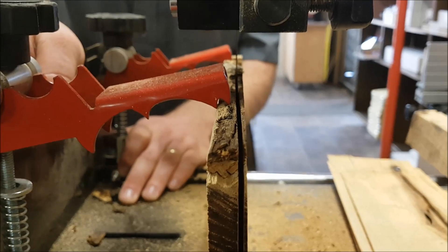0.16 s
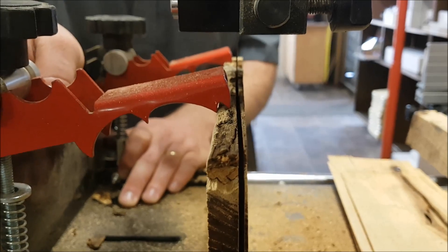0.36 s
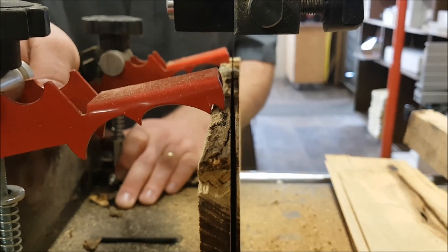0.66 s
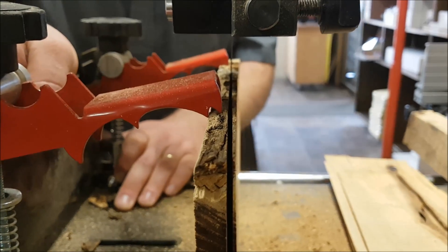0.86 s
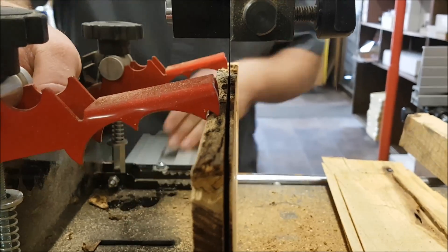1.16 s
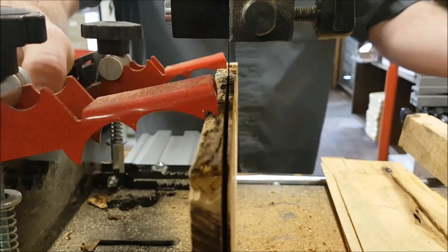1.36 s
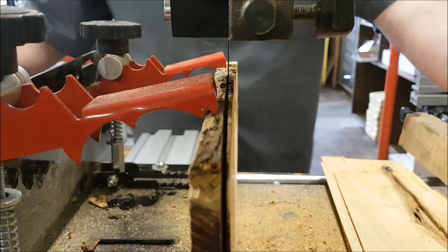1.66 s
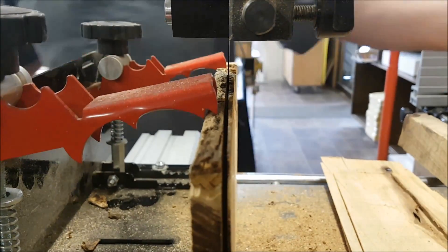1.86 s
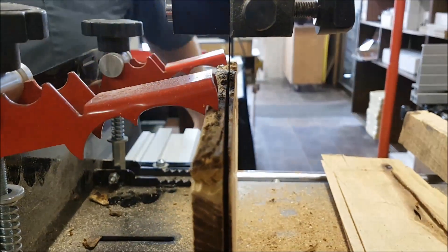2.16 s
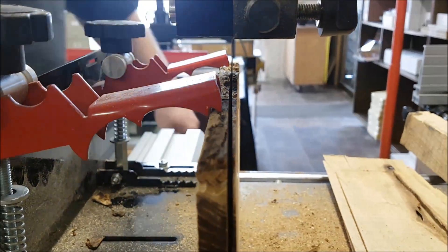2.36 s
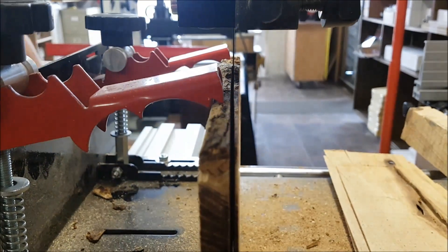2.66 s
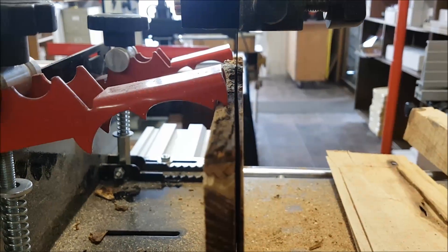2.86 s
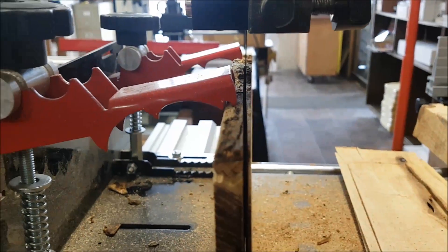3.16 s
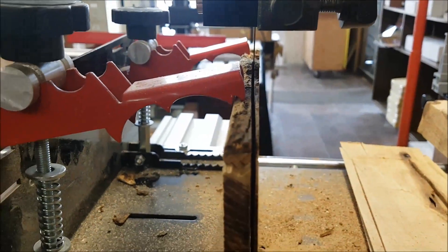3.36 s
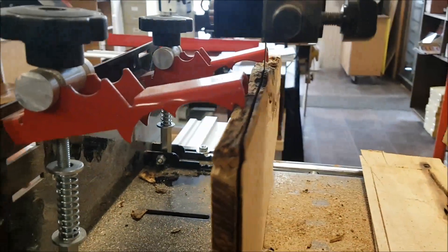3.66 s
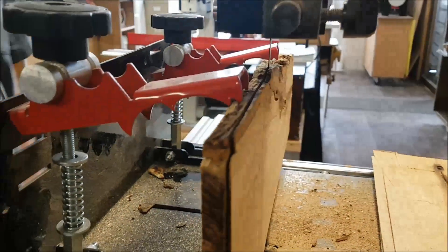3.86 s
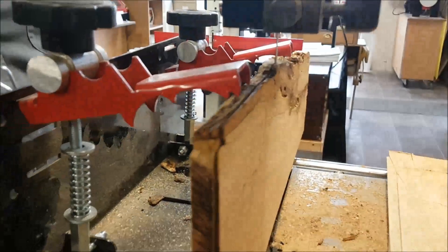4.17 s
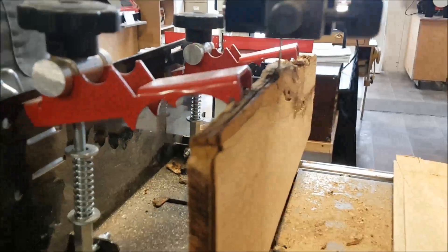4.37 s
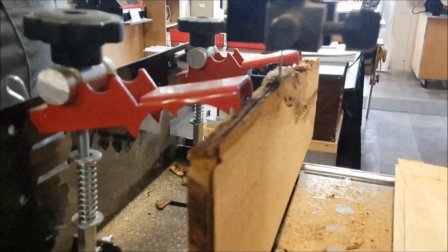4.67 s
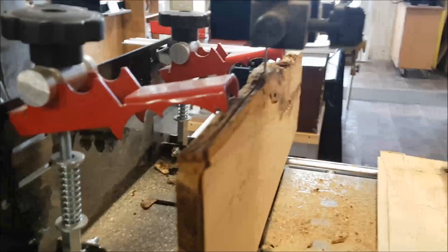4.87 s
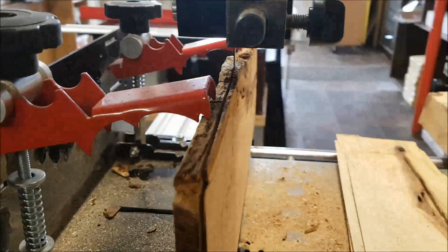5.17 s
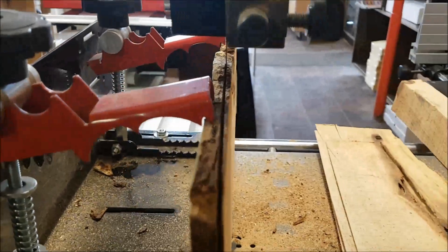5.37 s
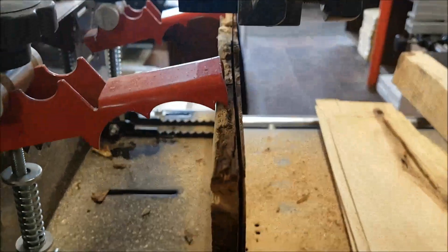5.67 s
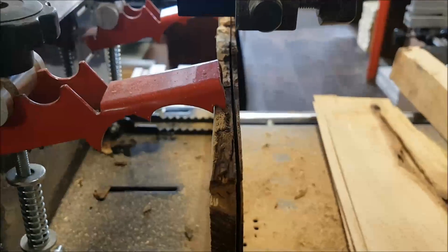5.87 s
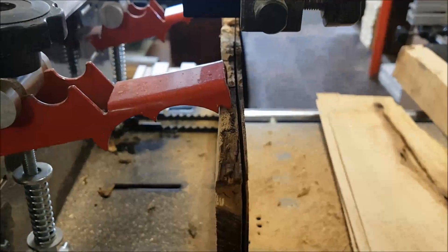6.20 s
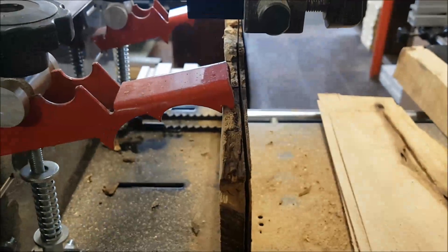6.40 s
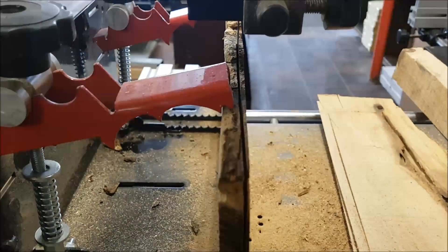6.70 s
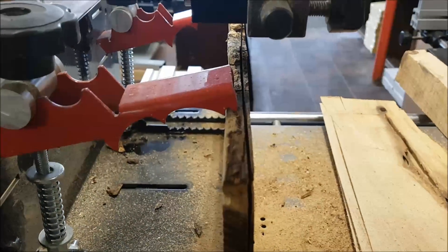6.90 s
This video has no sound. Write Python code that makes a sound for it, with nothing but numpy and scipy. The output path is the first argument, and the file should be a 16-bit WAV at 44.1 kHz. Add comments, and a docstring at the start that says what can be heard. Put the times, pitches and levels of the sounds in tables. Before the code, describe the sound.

A bandsaw squeals through the end of a board, then is switched off and coasts down with a falling whine and metallic hiss.

```python
"""A bandsaw finishes a cut through a board in a workshop: stick-slip makes the blade squeal in the kerf
for a second, then it runs free. The motor is switched off, and the whine at the tooth-passing frequency
sinks as the wheels coast, while friction in the guides keeps the band hissing and ringing.
A second motor is then switched off and runs down quickly. Ticks of the band on its guides and soft
bumps from around the table go on almost to the end."""
import sys
import numpy as np
from scipy import signal
from scipy.fft import rfft, irfft, next_fast_len
from scipy.io import wavfile
from scipy.ndimage import uniform_filter1d, map_coordinates

SR = 44100
rng = np.random.default_rng(int(sys.argv[2]) if len(sys.argv) > 2 else 0)


def store_wav(level_fs):
    """Save 16-bit WAV to argv[1]."""
    pcm = np.round(np.clip(np.atleast_2d(level_fs), -1, 1) * 32767)
    wavfile.write(sys.argv[1], SR, pcm.T.astype(np.int16))


N = 310444
TIME = np.arange(N) / SR
FFT_SIZE = next_fast_len(N)
FREQS = np.maximum(np.arange(FFT_SIZE // 2 + 1) * SR / FFT_SIZE, 1)
CUTOFF_HZ = 15800


# tooth-passing frequency: time_s, rate_hz
TOOTH_PASSING = [(0.0, 2002.0), (0.35, 2001.0), (0.8, 2008.0), (1.05, 2022.0), (1.69, 2028.0),
                 (1.76, 1974.0), (1.84, 1920.0), (2.0, 1832.0), (2.24, 1734.0), (2.48, 1651.0),
                 (2.96, 1516.0), (3.68, 1335.0), (4.64, 1112.0), (5.6, 897.0), (6.08, 787.0), (6.56, 670.0),
                 (7.04, 548.0)]
def blade_motion():
    """Phase is the integral of frequency: the tooth rate sums to the count of teeth passed."""
    rate_hz, = in_time(TOOTH_PASSING)
    return rate_hz, np.cumsum(rate_hz) / SR


# resonances of the squealing band: centre_hz, width_hz, gain_db
SQUEAL_RESONANCES = [(1624, 44, -5.5), (1714, 50, -6), (1870, 50, -22)]
# hard catches in the kerf, last on the few remaining fibres: middle_s, half_length_s, level_db
KERF_CATCHES = [(0.023, 0.026, -25.5), (0.197, 0.014, -24), (0.27, 0.03, -24.5), (0.416, 0.012, -24.5),
                (.46, 0.015, -25.5), (0.65, 0.025, -29), (0.716, 0.015, -25), (0.787, .006, -27),
                (0.804, 0.0074, -21.5), (0.843, 0.0088, -22), (0.88, .012, -25.5), (0.973, 0.017, -30.5),
                (1.066, 0.0083, -27.5), (1.153, 0.019, -34)]
def kerf_squeal(pressure_db, level_db=-30, end_s=0.88, release_s=0.053):
    """Stick-slip oscillation: the buried band swings at its resonances until friction limits it."""
    ringing = shape(scrape(grain_db=4.5), response(FREQS, SQUEAL_RESONANCES))
    swing = rms_one(signal.hilbert(ringing, FFT_SIZE)[:N])
    phase = np.angle(swing)
    drive = rms_one(np.abs(swing) * from_db(5 * (pressure_db + 0.81 * drift(29.97))))
    amplitude = rms_one(np.tanh(1.1 * drive))
    # limiting adds harmonics; the third grows towards the end of the cut
    third = from_db(-24.5 + 7.5 * np.minimum(TIME, end_s)) * amplitude ** 2
    wave = np.cos(phase) + from_db(-14) * np.cos(2 * phase) + third * np.cos(3 * phase)
    chatter = amplitude * from_db(level_db) * np.exp(-np.maximum(TIME - end_s, 0) / release_s)
    catches = sum(from_db(db) * swell(s, half) for s, half, db in KERF_CATCHES)
    return np.maximum(chatter, np.tanh(2 * np.abs(swing)) * catches) * np.sqrt(2) * wave


# fundamental of the tooth tone: time_s, level_db
WHINE_LEVEL = [(0, -49), (.95, -54), (1.1, -45.5), (1.72, -48), (1.85, -39), (2.3, -42), (3.3, -41),
               (3.8, -48.5), (4.6, -48.5), (5.55, -56.5), (6.1, -52), (7.04, -70)]
# its overtones, before the guides colour them: multiple, level_db
TOOTH_HARMONICS = [(2, -8), (3, -5), (4, -10), (5, -8), (6, 0), (7, 0.5), (8, -5), (11, 0), (15, -1),
                   (18, -9), (24, -7)]
def tooth_tones(teeth, rate_hz, pressure_db, body):
    """Periodic forcing: the teeth make a harmonic series whose overtones swell at each resonance."""
    phase = 2 * np.pi * teeth + 0.067 * drift(35)
    multiples, levels = np.transpose(TOOTH_HARMONICS)
    overtones = np.zeros(N)
    for k in range(2, 25):
        gain = np.interp(k * rate_hz, FREQS, body) * (k * rate_hz < CUTOFF_HZ)
        level_db = np.interp(k, multiples, levels) - 18 + 2.5 * drift(12)
        overtones += gain * from_db(level_db) * np.sin(k * phase + 2 * np.pi * rng.random())
    tone = np.imag(uneven_set(teeth) * np.exp(1j * (phase + 1.04 * drift(35))))
    whine_db = in_time(WHINE_LEVEL)[0] + 1.8 * pressure_db + 2 * drift(18)
    return from_db(whine_db) * np.sqrt(2) * tone, overtones


def uneven_set(teeth, depth=0.26, teeth_per_loop=163):
    """Modulation: unevenly set teeth give their tone sidebands, which beat as the band loops round."""
    sidebands = sum(np.exp(2j * np.pi * (k * teeth / teeth_per_loop + rng.random())) / abs(k)
                    for k in (-2, -1, 0.81, 2))
    return rms_one(1 + depth * sidebands)


# friction on the band: time_s, hiss_db, treble_db
FRICTION_LEVELS = [(0, -35.5, -34.5), (.13, -33.5, -32.5), (.33, -34.5, -36), (.65, -34.5, -35.5),
                   (1.1, -35.5, -38.5), (1.55, -30, -37), (1.9, -34, -39.5), (2.8, -34.5, -40),
                   (2.87, -34.5, -38.8), (3.4, -32, -37.5), (3.67, -32, -39.5), (3.76, -34.5, -41),
                   (4.65, -34.5, -44), (5.1, -37.5, -45), (5.8, -36.5, -44), (7.04, -39.5, -46)]
# the band presses on its guides or eases off: middle_s, half_length_s, change_db
GUIDE_PRESSES = [(2.53, 0.047, 3), (4.894, .04, -1.5), (4.987, .025, 2.5), (5.06, 0.044, -1.5),
                 (6.12, 0.036, 1.3), (6.18, .025, -3)]
# resonances of the band in the kerf: centre_hz, width_hz, gain_db
KERF_RESONANCES = [(1135, 98, -5), (2510, 150, -4), (3200, 132, 10.5), (3640, 130, 0), (4800, 780, -3),
                   (5695, 105, 5.5), (7210, 210, -5.5), (8080, 220, -10), (9500, 260, -12.5),
                   (12090, 150, -7), (13650, 260, -20)]
# hiss of teeth and chips: frequency_hz, density_db
KERF_SPECTRUM = [(500, -27), (1000, -34), (1400, -9), (2200, -7), (4000, -6.5), (6500, -5.5), (8500, -13.5),
                 (11000, -16.5), (14000, -15.5), (16000, -22.5)]
# resonances of guides and frame: centre_hz, width_hz, gain_db
GUIDE_RESONANCES = [(1121, 23, -4), (1270, 45, -19), (1406, 51, -2.5), (1660, 150, -6.5), (1867, 110, -4.5),
                    (2306, 111, -2), (2570, 250, -8), (3300, 115, -6.5), (3940, 173, -3), (4462, 268, 2),
                    (4984, 140, -4.5), (5630, 180, -4), (6053, 216, -2), (6580, 180, -9.5),
                    (8440, 125, -10.5), (9070, 105, -10), (11420, 250, -16.5), (13250, 720, -16)]
# hiss of steel on the guides: frequency_hz, density_db
GUIDE_SPECTRUM = [(500, -36.5), (1000, -13.5), (2000, -19.5), (3500, -13), (5300, -16.5), (7200, -10.5),
                  (7900, -15.5), (10000, -16.5), (12200, -19), (14000, -23.5), (16000, -23)]
def running_blade(teeth, rate_hz, pressure_db):
    """Source and filter: friction excites first the kerf, then the guides, beneath the tooth tones."""
    press_db = sum(db * swell(s, half) for s, half, db in GUIDE_PRESSES)
    hiss_db, treble_db = in_time(FRICTION_LEVELS) + press_db
    bite = in_wood()
    kerf = hiss_response(KERF_RESONANCES, KERF_SPECTRUM)
    guides = hiss_response(GUIDE_RESONANCES, GUIDE_SPECTRUM)
    force = rms_one(scrape(grain_db=1.5) * from_db(pressure_db + 0.42 * drift(25)))
    force += from_db(2.5 - hiss_db) * knocks() * rng.standard_normal(N)
    rub = np.sqrt(bite) * shape(force, kerf) + np.sqrt(1 - bite) * shape(force, guides)
    whine, overtones = tooth_tones(teeth, rate_hz, pressure_db, guides)
    # harder contact is brighter: above 7.5 kHz the hiss follows its own level
    treble = shape(rub, 1 / (1 + (7500 / FREQS) ** 12))
    treble_rms = np.sqrt(uniform_filter1d(treble ** 2, SR // 4) + 1e-12)
    hiss = from_db(hiss_db - 3) * (rub - treble) + from_db(treble_db - 0.64) * treble / treble_rms
    # wood in the gullets damps the overtones
    return hiss + from_db(hiss_db) * (1 - 0.35 * bite) * overtones + whine


def in_wood(middle_s=1.002, exit_length_s=0.34):
    """Contact with the wood falls from 1 to 0 as the board runs out."""
    return np.clip(0.5 - (TIME - middle_s) / exit_length_s, 0, 1)


# unevenness of wheels and pulley: period_teeth, depth_db
WHEEL_RUNOUT = [(159.4, 0.6), (93, 0), (53, 0.17), (65.6, 1), (33.62, 0.78)]
def guide_pressure_db(teeth):
    """Runout: uneven wheels and pulley vary the band's pressure on its guides periodically."""
    return sum(db * np.cos(2 * np.pi * (teeth / period + rng.random())) for period, db in WHEEL_RUNOUT)


# ringing of the band between its guides: time_s, level_db
SPAN_LEVEL = [(1.17, -50), (1.24, -35.5), (1.43, -35), (1.65, -39), (2.82, -37.5), (2.91, -34.5),
              (3.3, -37.5), (3.8, -41), (7.04, -45)]
# modes of that span: centre_hz, width_hz, gain_db
SPAN_RESONANCES = [(2980, 88, 6.5), (3090, 132, 1.5)]
def band_ring(pressure_db):
    """Modal response: the free span rings in uneven spurts as it rubs, and after every knock."""
    spurts = rms_one(from_db(0.9 * pressure_db + 1.5 * drift(14)))
    rubbing = spurts * from_db(in_time(SPAN_LEVEL)[0]) * np.sqrt(1 - in_wood())
    force = np.hypot(rubbing, from_db(-1) * knocks()) * scrape(grain_db=2.5)
    return shape(force, rms_one(response(FREQS, SPAN_RESONANCES)))


# the band hits its guides, from dry tick to short scrape: start_s, level_db, decay_s
GUIDE_KNOCKS = [(.946, -31, .004), (1.693, -42, 0.0036), (1.977, -31, .004), (2.066, -34.5, 0.011),
                (2.16, -32, 0.0064), (2.247, -36, 0.016), (2.351, -33, 0.019), (2.515, -37, .004),
                (2.545, -30.5, .005), (2.86, -32.5, .02), (3.032, -41, 0.013), (3.081, -31.5, 0.008),
                (3.703, -30, .004), (3.805, -38, 0.013), (4.06, -34, 0.015), (4.189, -39, 0.022),
                (4.287, -38, .018), (4.78, -33, 0.023), (4.802, -36, 0.0036), (4.938, -35.5, 0.023),
                (5.1, -37, .015), (5.266, -38, .015), (5.624, -38, .015), (5.824, -32, .004),
                (6.022, -39, .012), (6.26, -30, .004)]
def knocks():
    """Impact: the force envelope of each knock starts at once and decays exponentially."""
    force = np.zeros(N)
    for start_s, db, decay_s in GUIDE_KNOCKS:
        start = int(start_s * SR)
        age = TIME[:min(SR // 4, N - start)]
        force[start:start + len(age)] += from_db(db) * np.exp(-age / decay_s)
    return force


# tooth overtones that sing out: middle_s, half_length_s, multiple, level_db, tremble_rad
TOOTH_SQUEAKS = [(.07, 0.13, 6, -37, 2.1), (.66, .17, 6, -44, 0.64), (1.12, .12, 6, -50, .4),
                 (.95, .4, 7, -53, .6), (1.606, 0.21, 3, -37, 0.31), (1.624, .14, 2, -42.5, 0.35),
                 (2.0, .2, 7, -52, .3), (2.652, 0.31, 3, -41.5, 0.23), (3.07, 0.29, 2, -38, 0.73),
                 (3.156, 0.34, 3, -38, 1.2), (4.2, 0.68, 2, -47.5, 0.59), (5.55, 0.45, 2, -46, 1.3),
                 (6.14, .07, 4, -40, 0.99), (6.12, 0.063, 3, -46.5, 0.57)]
# belt and bearing tones in the cabinet: middle_s, half_length_s, multiple, level_db, tremble_rad
BELT_AND_BEARINGS = [(1.25, 0.28, .55, -52, 2.3), (3.57, 0.3, .5, -58.5, .9), (4.39, .3, .58, -53.5, 0.73),
                     (4.32, 0.22, .42, -61, 1.1), (4.98, 0.1, .52, -61, 0.81), (5.4, 0.12, .54, -62, 0.53)]
def resonant_swells(rows, teeth, flutter_db):
    """Passage through resonance: tones locked to the tooth rate swell at the listed moments."""
    tones = np.zeros(N)
    for middle_s, half_s, multiple, db, tremble_rad in rows:
        phase = 2 * np.pi * multiple * teeth + tremble_rad * drift(40)
        envelope = from_db(db + flutter_db * drift(19)) * swell(middle_s, half_s)
        tones += envelope * np.sqrt(2) * np.sin(phase)
    return tones


# resonances of the cabinet: centre_hz, width_hz, gain_db
CABINET_RESONANCES = [(346, 17, -4.5), (447, 34, -6.5), (506, 11.8, 3), (702, 28, -0.5), (796, 7.7, -16)]
# its broad rumble: frequency_hz, density_db
CABINET_SPECTRUM = [(20, -50), (50, -44), (100, -29), (160, -22.5), (250, -13), (390, -16.5), (460, -1.5),
                    (590, -10.5), (720, -6), (950, -6), (1300, -27), (2500, -43)]
def cabinet_rumble(rate_hz, db_per_octave=4.5, critical_hz=1060, width_hz=170):
    """Forced vibration: the rumble fades with blade speed, but swells around a critical speed."""
    slowing_db = db_per_octave * np.log2(rate_hz / rate_hz.max())
    critical_db = 4.5 * np.exp(-((rate_hz - critical_hz) / width_hz) ** 2)
    cabinet = response(FREQS, CABINET_RESONANCES, CABINET_SPECTRUM)
    return from_db(-53 + slowing_db + critical_db) * rms_one(shape(scrape(grain_db=3.5), cabinet))


def drive_hum(teeth, rate_hz, db_per_octave=27, load_loss_db=4, teeth_per_cycle=8.35):
    """Rotational tone: the drive's hum is weaker under load, and sinks and fades with speed."""
    level_db = -67 + db_per_octave * np.log2(rate_hz / rate_hz.max()) - load_loss_db * in_wood()
    return from_db(level_db + 2 * drift(15)) * np.sqrt(2) * np.sin(2 * np.pi * teeth / teeth_per_cycle)


# tone of the second motor: time_s, level_db
SECOND_MOTOR_LEVEL = [(0, -76), (1.2, -62), (2.55, -57), (2.68, -51.5), (2.88, -56.5), (3.0, -69),
                      (3.8, -90)]
def second_motor(pitch_hz=613, off_s=2.57, coast_s=0.81):
    """Exponential run-down: the pitch follows the speed, and the fan's rush follows its cube."""
    speed = np.exp(-np.maximum(TIME - off_s, 0) / coast_s)
    phase = 2 * np.pi * np.cumsum(pitch_hz * speed) / SR + 0.28 * drift(25)
    level_db = in_time(SECOND_MOTOR_LEVEL)[0] + 2 * drift(5.5)
    tone = from_db(level_db) * np.sqrt(2) * (np.sin(phase) + from_db(2) * np.sin(6 * phase))
    fan = response(FREQS, modes=[(194, 21, -10), (386, 89, 0.5), (537, 48, 9)])
    return tone + from_db(-55) * speed ** 3 * rms_one(shape(rng.standard_normal(N), fan))


# soft pushes around the table: start_s, level_db
TABLE_BUMPS = [(.82, -62), (3.195, -61), (3.495, -60), (3.725, -54), (3.97, -58), (4.47, -61), (4.85, -58),
               (4.92, -58), (5.16, -50), (5.185, -57), (5.385, -54), (5.518, -58), (5.648, -53.5),
               (6.845, -59)]
def table_bumps(pitch_hz=138, decay_s=0.0037, push_s=0.00098):
    """Damped oscillator: each short push sets off a low swing that dies almost at once."""
    hits = np.zeros(N)
    for start_s, db in TABLE_BUMPS:
        hits[int(start_s * SR)] = from_db(db)
    push = signal.lfilter([1], [1, -np.exp(-1 / (push_s * SR))], hits + 1e-18)
    radius, angle = np.exp(-1 / (decay_s * SR)), 2 * np.pi * pitch_hz / SR
    return from_db(6) / 22 * signal.lfilter([1, -1], [1, -2 * radius * np.cos(angle), radius ** 2], push)


def workshop(x, t60_s, wet_db):
    """Reverberation: dense reflections from table, shelves and walls decay exponentially."""
    t = TIME[:SR // 2]
    tail = rng.standard_normal(len(t)) * from_db(-60 * t / t60_s) * (t > 0.003)
    wet = signal.fftconvolve(x, tail / np.sqrt(np.sum(tail ** 2)))[:N]
    return (x + from_db(wet_db) * wet) / np.sqrt(1 + from_db(wet_db) ** 2)


def scrape(grain_db):
    """Friction noise: tiny contacts of uneven strength, about a millisecond each."""
    strength = np.repeat(from_db(grain_db * rng.standard_normal(N // 40 + 1)), 40)[:N]
    return rms_one(rng.standard_normal(N) * strength)


def response(hz, modes, spectrum=None):
    """Gain of a body: resonance peaks and a broad spectrum add in power."""
    power = sum(from_db(db) ** 2 / (1 + ((hz - centre) / width) ** 2) ** 2 for centre, width, db in modes)
    if spectrum is not None:
        points_hz, db = np.transpose(spectrum)
        power += from_db(np.interp(np.log(hz), np.log(points_hz), db)) ** 2
    return np.sqrt(power)


def hiss_response(modes, spectrum):
    """A body's gain, scaled so that unit white noise has rms 1 between 3.7 and 7 kHz."""
    gain = response(FREQS, modes, spectrum)
    inside = (FREQS > 3700) & (FREQS < 7000)
    return gain / np.sqrt(np.mean(gain ** 2 * inside))


def shape(x, gain):
    """Linear filtering: multiply the spectrum by a frequency response."""
    return irfft(rfft(x, FFT_SIZE) * gain, FFT_SIZE)[:N]


def drift(rate_hz):
    """Random fluctuation with rms 1 and about `rate_hz` turns a second."""
    knots = rng.standard_normal(2048)
    return rms_one(map_coordinates(knots, [TIME * 2 * rate_hz], order=1, mode="wrap"))


def swell(middle_s, half_s):
    """A rounded rise and fall of height 1."""
    return np.exp(-np.minimum(np.abs((TIME - middle_s) / half_s), 4) ** 3)


def in_time(rows):
    """Interpolate a table's columns at every sample."""
    time_s, *columns = np.transpose(rows)
    return [np.interp(TIME, time_s, column) for column in columns]


def from_db(db):
    """Decibels to gain."""
    return 10 ** (np.asarray(db) / 20)


def rms_one(x):
    """Scale to rms 1."""
    return x / np.sqrt(np.mean(np.abs(x) ** 2) + 1e-20)


def scene():
    """Superposition: saw, second motor and bumps add up, the same in both channels."""
    rate_hz, teeth = blade_motion()
    pressure_db = guide_pressure_db(teeth)
    machines = running_blade(teeth, rate_hz, pressure_db) + band_ring(pressure_db)
    machines += cabinet_rumble(rate_hz) + drive_hum(teeth, rate_hz) + second_motor()
    machines += resonant_swells(TOOTH_SQUEAKS, teeth, flutter_db=2)
    machines += resonant_swells(BELT_AND_BEARINGS, teeth, flutter_db=4)
    squeal = kerf_squeal(pressure_db)
    sound = workshop(machines, t60_s=0.71, wet_db=-8)
    sound += workshop(squeal, t60_s=0.63, wet_db=-13)  # the kerf is close, so nearly dry
    sound += table_bumps()
    return np.array([sound, sound])


def record(dry):
    """Band limiting: the microphone loses the deepest bass, and the top is cut steeply."""
    lean = signal.sosfilt(signal.butter(2, 50, "high", fs=SR, output="sos"), dry)
    return signal.sosfilt(signal.ellip(12, 0.1, 80, CUTOFF_HZ, fs=SR, output="sos"), lean)


dry = scene()
out = record(dry)
store_wav(out)
```